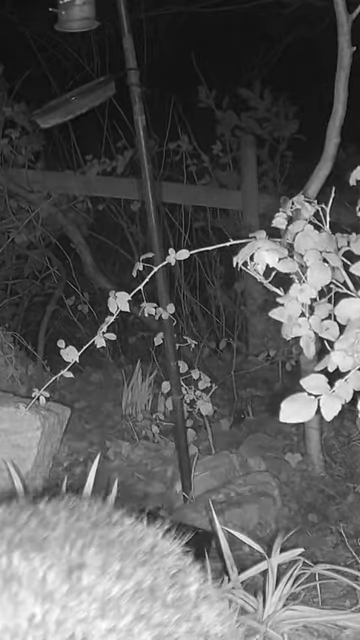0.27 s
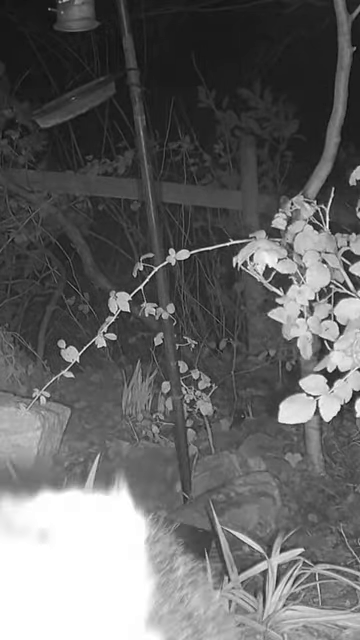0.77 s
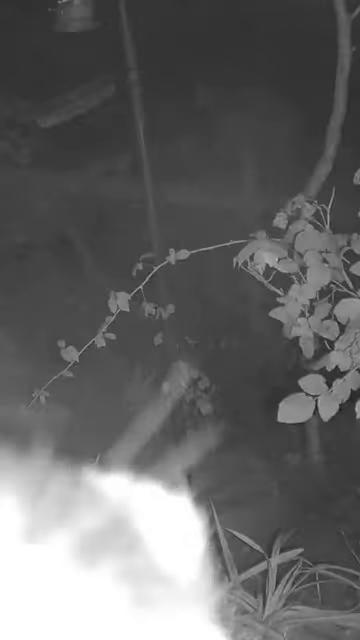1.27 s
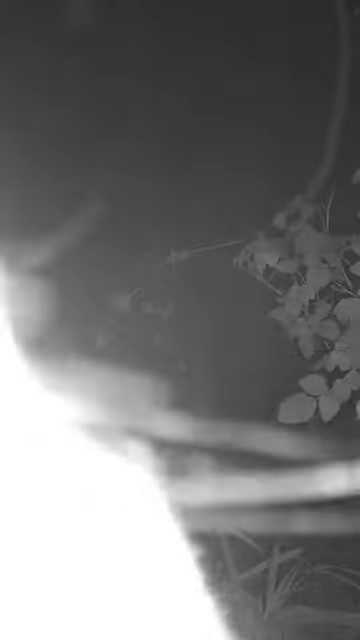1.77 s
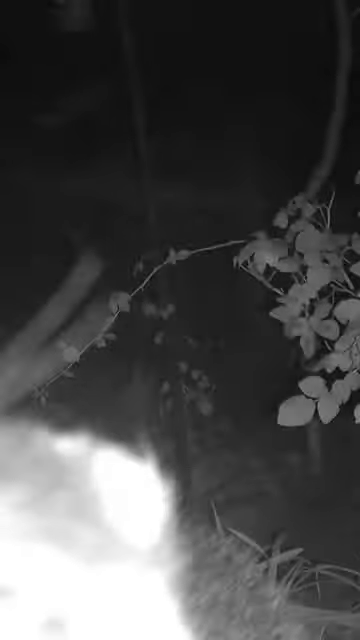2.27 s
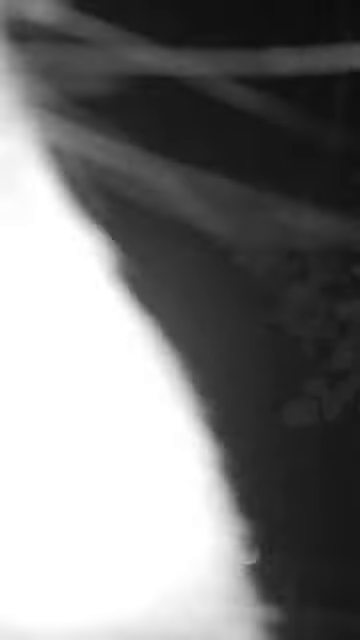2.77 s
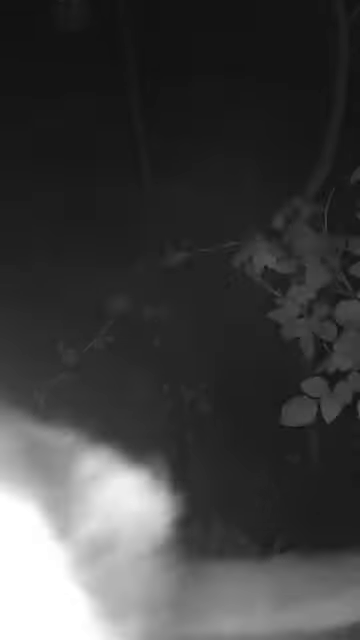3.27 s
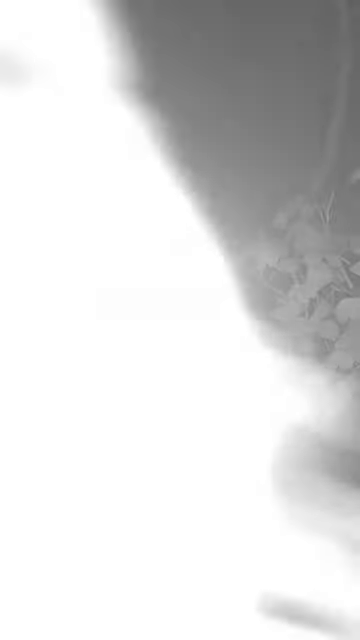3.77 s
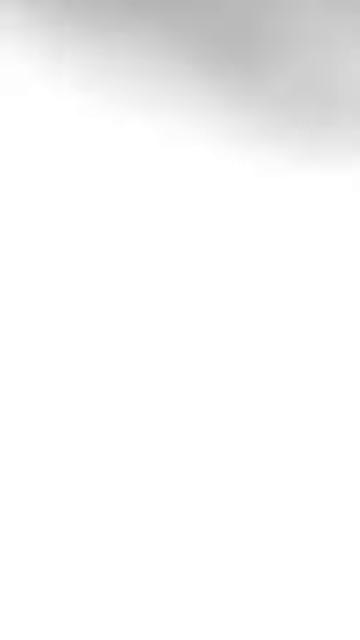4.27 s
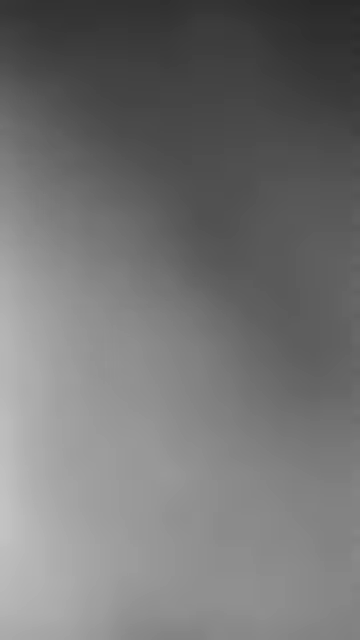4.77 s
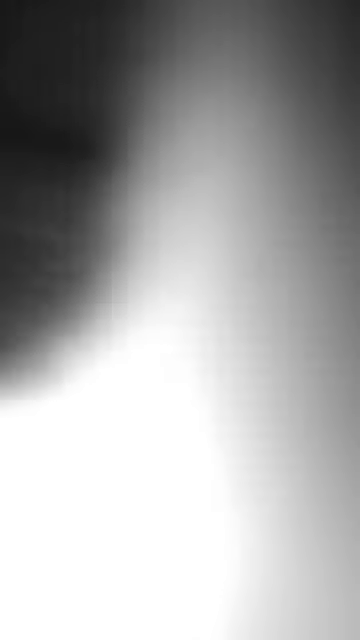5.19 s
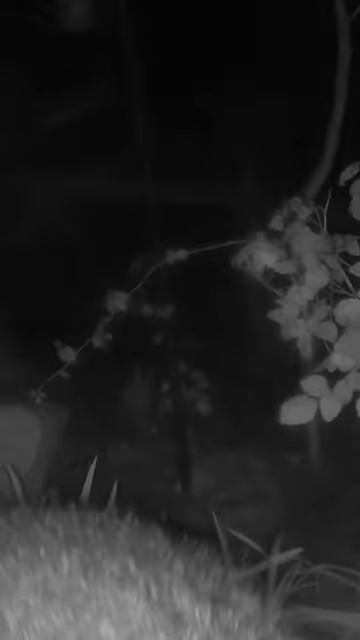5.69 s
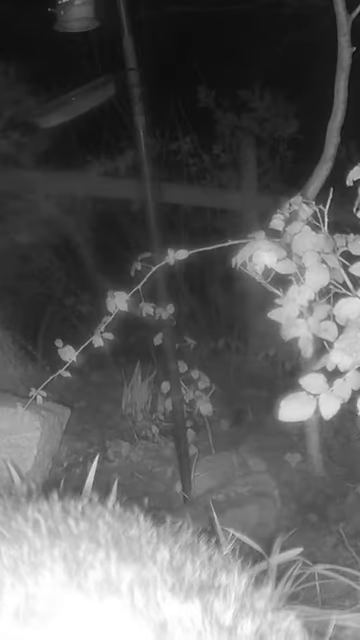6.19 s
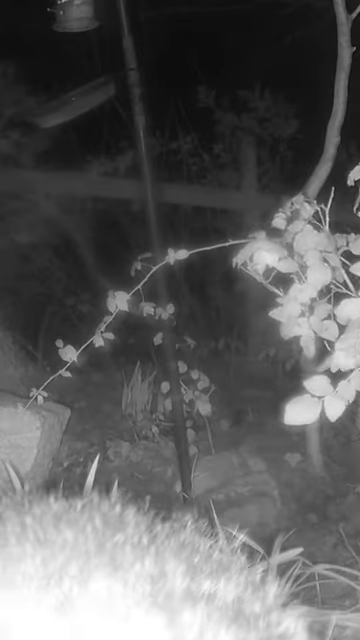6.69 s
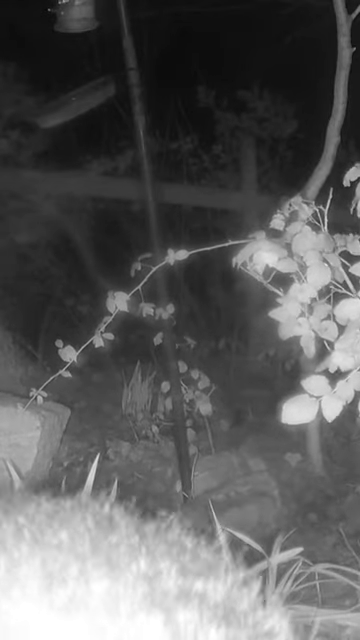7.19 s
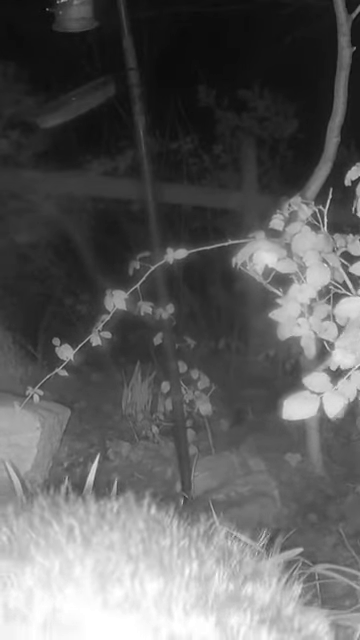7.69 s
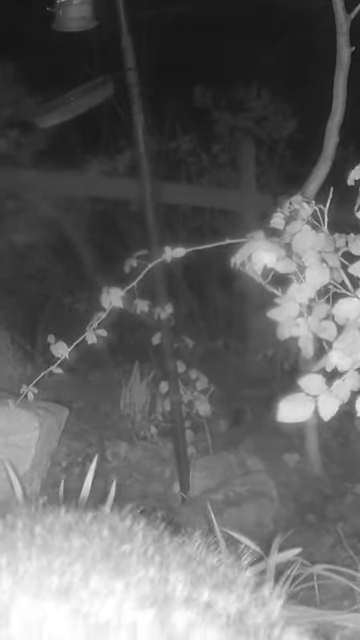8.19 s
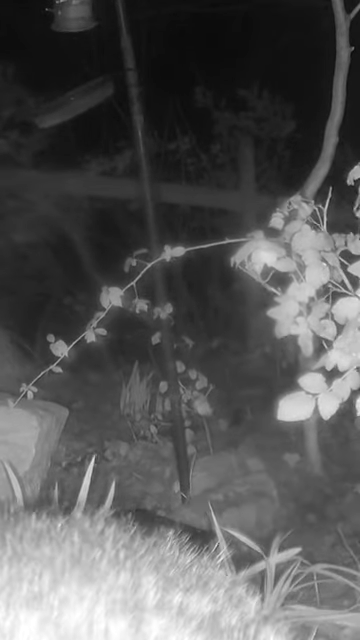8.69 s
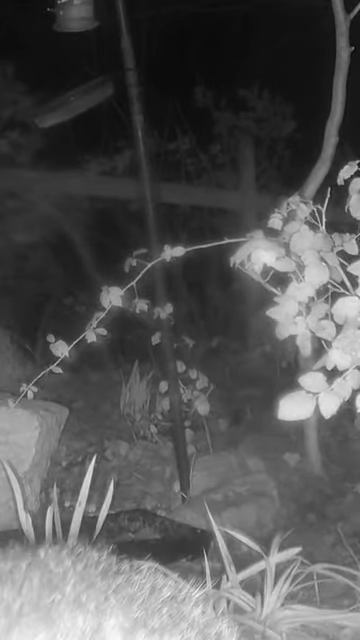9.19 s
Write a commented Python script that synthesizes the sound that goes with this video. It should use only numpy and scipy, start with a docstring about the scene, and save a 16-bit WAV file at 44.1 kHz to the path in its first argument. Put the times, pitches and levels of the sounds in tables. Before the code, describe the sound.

Very close, dry mono sound from a microphone inside a knocked plastic case outdoors. Fine hiss and a thin high whine stay constant while an animal puffs air through its nose, bumps and scrapes the shell and makes it sway with deep rumbles. Irregular thuds cluster in the middle, sniffing fades, and after a quiet gap a sudden overloaded crash of blows hits, then soft sniffs and a last scuffle.

```python
"""In a quiet garden at night, a badger sniffs at a trail camera and shoves it about.
Puffs of shaped noise hiss and whistle; snout and paws strike ringing modes of the plastic housing.
Random flicks make the rasp of bristles, and each shove sets the camera swaying, lurching and juddering.
The hardest blows overload the input; the camera's own hiss and thin whine run underneath throughout."""
import sys
import numpy as np
from scipy import signal
from scipy.fft import rfft, irfft, next_fast_len
from scipy.io import wavfile

SR = 44100
rng = np.random.default_rng(int(sys.argv[2]) if len(sys.argv) > 2 else 0)


def unload_wav(signal):
    """Save mono or channel-first audio to the path in sys.argv[1] as 16-bit WAV at rate SR, clipped to [-1, 1]."""
    wavfile.write(
        sys.argv[1],
        SR,
        np.round(np.clip(np.atleast_2d(signal).T, -1, 1) * 32767).astype(np.int16),
    )


N = 416744  # length in samples
TIME = np.arange(N) / SR  # seconds


def amp(db):
    """Turns decibels into a plain multiplier."""
    return 10 ** (np.asarray(db) / 20)


def unit(x):
    """Scales x to rms 1."""
    return x / np.sqrt(np.mean(x ** 2) + 1e-20)


def add(mix, start_s, sound):
    """Adds a sound to the mix from start_s on, cutting off what runs past the end."""
    part = mix[max(round(start_s * SR), 0):][:len(sound)]
    part += sound[:len(part)]


def butter(x, hz, kind, order=2):
    """Filters x, keeping the low part or a band of it."""
    edges = np.clip(hz, 1, SR / 2 - 1)
    return signal.sosfilt(signal.butter(order, edges, kind, fs=SR, output="sos"), x)


def resonance(x, hz, width):
    """Passes x twice through a resonance of gain 1, so that its skirts are steep."""
    b, a = signal.iirpeak(hz, hz / width, fs=SR)
    once = signal.lfilter(b, a, x)
    return signal.lfilter(b, a, once)


def coloured(x, points):
    """Filters x with a curve drawn through (Hz, dB) points; rms 1."""
    hz, db = np.transpose(points)
    size = next_fast_len(len(x))
    bins = np.fft.rfftfreq(size, 1 / SR)
    gain = amp(np.interp(np.log(bins + 1), np.log(hz), db))
    return unit(irfft(rfft(x, size) * gain, size)[:len(x)])


def wander(size, hz):
    """Slow chance, rms 1, changing up to about hz times a second."""
    return unit(butter(rng.standard_normal(size), hz, "low"))


# The badger's sniffs. Each row: time of the peak in seconds, level in dB, rise in seconds,
# fall in seconds, ring of the nose in dB before the common nasal_db.
SNIFFS = [(0.423, -46.5, .016, 0.012, 1.5), (0.464, -34, 0.015, 0.011, -0.5), (1.328, -35, 0.011, 0.025, 5),
          (1.45, -46.5, 0.04, 0.031, 4), (2.192, -50.5, 0.069, .012, 0), (2.264, -36.5, 0.038, 0.022, -1.5),
          (2.573, -47, 0.0053, .008, 8), (2.614, -46, 0.02, 0.027, 3.5), (2.875, -51.5, 0.005, 0.023, 8),
          (3.004, -37, 0.014, 0.014, 1.5), (3.278, -50, .025, 0.015, 4.5), (3.324, -49.5, 0.025, 0.069, -7),
          (3.41, -33, 0.021, 0.02, -7.5), (3.547, -46, 0.01, 0.011, 2.5), (3.578, -43, 0.012, 0.013, -0.5),
          (3.663, -55.5, 0.066, 0.041, -18), (3.854, -46, 0.007, 0.017, 15.5),
          (3.952, -41.5, .011, 0.02, 5), (4.119, -51.5, 0.052, 0.047, 8), (4.352, -53.5, 0.009, .013, 7.5),
          (4.473, -43, 0.009, 0.016, 3), (4.565, -46.5, .007, .012, 6), (4.854, -46.5, 0.0022, .032, 10),
          (4.954, -46.5, 0.016, 0.038, 2.5), (5.018, -48.5, 0.021, .05, 5),
          (5.148, -42.5, 0.031, 0.014, -6), (5.189, -41, .012, 0.017, 4.5),
          (5.396, -43, 0.035, 0.071, -6.5), (5.443, -39, 0.016, 0.019, -6), (5.474, -34, 0.02, 0.011, -8),
          (5.599, -47.5, 0.039, 0.066, -6), (7.348, -50.5, 0.051, .08, -4.5),
          (7.781, -50.5, .046, .031, 0.5), (8.213, -21, 0.0056, 0.0099, 1),
          (8.236, -35.5, 0.0029, .012, 12), (8.548, -47, 0.037, 0.014, -5), (8.738, -53, .023, .009, -1.5),
          (8.928, -44.5, 0.026, .013, -2.5), (9.138, -37, 0.019, 0.02, 2), (9.35, -43, .018, 0.017, -2.5)]
SNIFF_WHISTLE_HZ, SNIFF_WHISTLE_DB = 4325, -10.5
# Soft, whistling wheezes between the sniffs. Each row: time of the peak in seconds, level in dB.
WHEEZES = [(0.277, -61), (1.562, -57), (1.846, -60.5), (2.45, -59.5), (3.752, -58.5)]
WHEEZE_S, WHEEZE_NASAL_DB = 0.041, 5  # the same time for rise and fall
WHEEZE_HZ, WHEEZE_WHISTLE_DB = 3270, 2


def sniffs():
    """Sharp puffs of air from the nose, with a soft wheeze here and there between them."""
    out = np.zeros(N)
    for row in SNIFFS:
        add(out, *puff(*row, SNIFF_WHISTLE_HZ, SNIFF_WHISTLE_DB))
    for peak_s, db in WHEEZES:
        add(out, *puff(peak_s, db, WHEEZE_S, WHEEZE_S, WHEEZE_NASAL_DB, WHEEZE_HZ, WHEEZE_WHISTLE_DB))
    return out


# Resonances of the snout. Each row: pitch in Hz before a small random shift in each puff,
# width of one filter pass in Hz, level in dB against the others.
SNOUT = [(881, 77, 6.5), (1038, 102, 8), (1256, 110, -11), (1727, 395, -3), (2460, 270, -7.5)]
# Air rushing through the nostrils. Each row: frequency in Hz, relative level in dB per Hz.
RUSH = [(150, 11), (330, 3), (700, 2), (1000, -1.5), (1350, 4.5), (2000, -6), (2500, 6), (3100, 6),
        (3700, -0.5), (4400, 6), (5100, 3.5), (6500, -8), (8300, -2.5), (9500, -37), (16000, -30)]
# Air grazing the microphone hole. Each row: frequency in Hz, relative level in dB per Hz.
FIZZ = [(4000, -32), (6100, 0), (6550, 1.5), (7000, -2), (8200, 1), (9100, 3.5), (10400, 1), (11500, -3.5),
        (13000, -2.5), (15000, -6), (16500, -31)]
FIZZ_DB_PER_NASAL_DB = -.3  # the more a puff rings in the snout, the less air grazes the microphone


def puff(peak_s, db, rise, fall, nasal, whistle_hz, whistle, rush_db=0, nasal_db=-1, fizz_db=0.0,
         whistle_width_hz=330, flutter_db=2):
    """A puff swells and dies: turbulence rings the snout, whistles in a nostril, fizzes on the mic hole."""
    lag = np.arange(-SR // 4, SR // 4) / SR  # seconds from the peak
    throat, nostril, edge, jet = rng.standard_normal((4, len(lag)))
    flare = 1 + .012 * rng.standard_normal()  # shifts all snout pitches together
    snout = np.zeros(len(lag))
    for k, (hz, width, gain) in enumerate(SNOUT):
        snout += (-1) ** k * amp(gain) * resonance(throat, hz * flare, width)
    # a gentle flow whistles, a hard one breaks up into a broad band
    breadth = whistle_width_hz * 2 ** ((db + 46) / 30)
    air = amp(rush_db) * coloured(nostril, RUSH)
    air += amp(nasal_db + nasal) * unit(snout)
    air += amp(fizz_db + FIZZ_DB_PER_NASAL_DB * nasal) * coloured(jet, FIZZ)
    air += amp(whistle) * unit(resonance(edge, whistle_hz, breadth))
    swell = np.exp(-abs(lag / np.where(lag < 0, rise, fall)) ** 1.5)
    level = amp(db + flutter_db * wander(len(lag), hz=106))
    return peak_s + lag[0], level * swell * air


# Blows on the housing. Each row: time in seconds, level in dB, hardness as the contact's cut-off in Hz,
# thud in dB against the knock before the common thud_db.
KNOCKS = [(0.473, -42.5, 330, 14.5), (2.249, -39, 450, 7.5), (2.581, -43.5, 723, -10),
          (2.626, -34, 1000, -12), (2.68, -24.5, 700, 6.5), (2.745, -44.5, 477, 30.5),
          (2.917, -21.5, 765, -31), (3.021, -41, 905, -17), (3.08, -30.5, 520, 12),
          (3.274, -39.5, 830, 9.5), (3.575, -38, 757, 3), (3.604, -32, 750, -17), (3.855, -46.5, 694, 11),
          (3.975, -38, 810, 2), (4.078, -28.5, 585, -4), (4.106, -33.5, 596, -14), (4.156, -28.5, 490, 6.5),
          (4.186, -28.5, 1500, 2), (4.288, -34, 670, 7), (4.455, -38.5, 645, 20.5), (4.594, -41, 696, 21),
          (4.658, -35, 700, 16), (4.726, -26, 770, 13.5), (5.368, -39, 847, 21.5), (5.896, -28.5, 450, 14),
          (5.941, -35.5, 700, 16), (6.26, -30, 666, 18.5), (6.289, -33.5, 880, 26),
          (6.323, -20, 1270, 14.5), (6.347, -25, 895, 13.5), (6.385, -42, 597, 11.5), (6.436, -46, 750, 12),
          (6.567, -36.5, 634, 19), (6.603, -40, 1000, 10), (6.624, -36.5, 528, 3),
          (6.726, -37.5, 523, 18.5), (6.755, -41.5, 750, -7), (6.78, -43, 760, -8), (6.923, -29, 750, 3),
          (6.946, -34.5, 760, -13), (6.965, -31.5, 656, 3), (7.167, -31, 840, -17), (7.201, -25.5, 925, 1),
          (7.217, -27.5, 1030, 10.5), (7.249, -41, 695, 3), (7.986, -35, 600, -16), (8.002, 3.5, 1000, 4.5),
          (8.012, -10, 1050, -1), (8.04, -35, 450, -5), (8.108, -23.5, 905, 14), (8.118, -4, 1460, -7),
          (8.133, -14, 1010, 12.5), (8.155, -11, 1310, 4), (8.167, -16, 880, -4), (8.234, -12, 1410, -5),
          (8.257, -23.5, 700, 11), (8.307, -21.5, 523, -4), (8.374, -40.5, 517, 18), (9.133, -35.5, 704, 7),
          (9.203, -40.5, 700, 10), (9.27, -34, 418, 7.5)]
# The whole box on its mount. Each row: pitch in Hz, level in dB, seconds to fade by 60 dB;
# ring() varies pitch and level a little.
THUD = [(64.4, 3, 0.11), (93.4, -0.5, 0.085), (181, -3, 0.16)]
SCUFF_DB, SCUFF_DB_PER_DB = -13.5, 0.33  # scuff against strike at 0 dB; lighter contacts slide more


def knocks(damping_per_s=28, touch_s=0.0051, grip_s=0.0081, thud_db=-7.0):
    """A contact scuffs around the strike; soft flesh wakes only the low modes, claws the high ones too."""
    out, t = np.zeros(N), np.arange(SR // 3) / SR
    lead = SR // 25  # samples before the strike, room for the scuff
    attack = slice(lead, lead + SR // 50)  # the 20 ms in which the level is set
    lag = t - t[lead]
    for strike_s, db, hard_hz, thud in KNOCKS:
        scuff_shape = np.exp(np.where(lag < 0, lag / touch_s, -lag / grip_s))
        grit = rng.standard_normal(len(t)) * scuff_shape
        force = amp(SCUFF_DB - SCUFF_DB_PER_DB * db) * grit / np.linalg.norm(grit)
        force[lead] += 1  # the clean strike
        contact = butter(force, hard_hz, "low", order=3)
        shell = signal.fftconvolve(contact, ring(HOUSING, t))[:len(t)]
        box = butter(signal.fftconvolve(force, ring(THUD, t))[:len(t)], 275, "low")
        blow = shell / shell[attack].std() + amp(thud + thud_db) * box / box[attack].std()
        # a hard push stays on the plastic and mutes it
        damped = np.exp(-damping_per_s * amp(db / 2) * np.maximum(lag, 0))
        add(out, strike_s - t[lead], amp(db) * blow * damped)
    return out


# The ringing plastic housing. Each row: pitch in Hz, level in dB, seconds to fade by 60 dB;
# ring() varies pitch and level a little.
HOUSING = [(260, -6, 0.039), (282.8, -3, 0.17), (344, 1, 0.023), (435, -10.5, 0.11), (487.7, -16, 0.19),
           (575, -10, 0.12), (629.6, 2.5, 0.039), (708, -6.5, 0.09), (825, -0.5, 0.0069), (866, -5, 0.058),
           (944, -22, 0.089), (1223, -2.5, 0.029), (1378, -7.5, 0.033), (1428, -2.5, 0.024),
           (1722, 2, 0.016), (2010, 2, 0.0062), (2520, -3.5, .025)]


def ring(modes, t):
    """Dying modes; each point of contact weights and bends them a little differently."""
    hz, db, t60 = np.transpose(modes)[:, :, None]
    weight, bend = rng.standard_normal((2, len(modes), 1))
    side = rng.choice([-1, 1], hz.shape)  # each mode starts upwards or downwards
    fade = np.exp(np.float32(-np.log(1000) * np.minimum(t / t60, 10)))
    wave = np.sin(np.float32(2 * np.pi * hz * (1 + .008 * bend) * t))
    return (side * amp(db + 2 * weight) * fade * wave).sum(0)


def scrape(judder, scrape_db=-15.5, grind_db=-13):
    """The snout drags while the camera judders; a hard push turns the drag into a brighter grinding."""
    drag = amp(scrape_db) * judder * slipping(slips_per_s=260, bright_hz=480)
    grind = amp(grind_db) * judder ** 2 * slipping(slips_per_s=600, bright_hz=1200)
    return drag + grind


def slipping(slips_per_s, bright_hz):
    """Tiny random slips that keep the housing murmuring, rms 1."""
    slips = rng.standard_normal(N) * (rng.random(N) < slips_per_s / SR)
    soft = butter(slips, bright_hz, "low")
    return unit(signal.oaconvolve(soft, ring(HOUSING, TIME[:SR // 3]))[:N])


# Bristles rubbing over the housing. Each row: start in seconds, length in seconds,
# level in dB before the common rub_db, pitch of the rasp in Hz.
RUBS = [(1.318, 0.016, -35, 4540), (2.243, 0.011, -30.5, 910), (2.603, 0.021, -41, 2980),
        (2.666, 0.011, -38.5, 990), (2.911, .003, -37.5, 1600), (4.048, 0.0067, -38, 3670),
        (4.149, 0.028, -30, 5050), (4.18, 0.0096, -22.5, 2080), (4.285, 0.0055, -25.5, 1970),
        (4.641, 0.015, -42, 2600), (4.652, 0.053, -27, 990), (4.849, 0.018, -50, 2600),
        (5.172, 0.019, -41, 2570), (7.968, 0.0076, -27.5, 6860), (8.118, 0.0073, -29.5, 5360),
        (9.167, 0.028, -31.5, 1580), (9.182, 0.0036, -22, 2670)]
# The rasp of bristles on plastic. Each row: frequency in Hz, relative level in dB per Hz.
RASP = [(410, -47), (700, -19.5), (971, -0.5), (1140, -14), (1730, -2), (2020, -9), (2270, -6), (3840, -11),
        (4490, -8.5), (12500, -23), (16000, -37)]


def rubs(flicks_per_s=3000, attack_s=0.0063, release_s=0.0071, ring_db=-5, ring_share=0.56,
         rub_db=-1, clump_db=1):
    """Bristles flick over the plastic in a dense, clumped crackle that rings one patch of the shell."""
    out, t = np.zeros(N), TIME[:SR // 5]
    for start_s, length, db, hz in RUBS:
        flicks = rng.standard_normal(len(t)) * (rng.random(len(t)) < flicks_per_s / SR)
        patch = unit(resonance(flicks, hz, ring_share * hz))
        rasp = coloured(flicks, RASP) + amp(ring_db) * patch
        stroke = np.minimum(t / attack_s, 1) * np.exp(-np.maximum(t - length, 0) / release_s)
        level = amp(db + rub_db + clump_db * wander(len(t), hz=160))
        add(out, start_s, level * stroke * rasp)
    return out


# Small dry ticks. Each row: start in seconds, peak level in dB, brightness in Hz (sets the band).
TICKS = [(0.0751, -22, 10000), (0.0918, -28, 3800), (0.097, -31, 3800), (0.1012, -29, 3570),
         (0.104, -21.5, 3800), (0.108, -27, 4000), (0.1233, -23.5, 4500), (0.597, -24, 12000),
         (1.373, -23, 9000), (2.591, -25, 11000), (2.916, -24, 2940)]


def ticks(decay_s=0.00089):
    """Tiny snaps of band-limited noise with almost no ring."""
    out, t = np.zeros(N), np.arange(SR // 50) / SR
    for start_s, db, hz in TICKS:
        burst = rng.standard_normal(len(t)) * np.exp(-t / decay_s)
        snap = butter(burst, [hz / 2.5, hz * 1.5], "band")
        add(out, start_s, amp(db) * snap / abs(snap).max())
    return out


# Shoves on the camera. Each row: time in seconds when the shove is half built up, seconds from then
# until it lets go, then the strengths in dB of the mount's sway, the body's lurch and the judder,
# before the trims in mount() and scrape().
SHOVES = [(0.464, 0.042, -21.5, -15, -32), (1.333, 0.058, -16.5, -17, -31.5),
          (2.187, 0.14, -23, -26, -45.5), (2.575, 0.043, -9, -14, -29), (2.665, 0.097, -12.5, -19, -25),
          (2.805, 0.045, -30, -30, -41), (2.902, 0.023, -10, -18.5, -37), (3.009, 0.077, -42, -13, -25),
          (3.252, 0.044, -14.5, -14.5, -30.5), (3.347, 0.043, -38, -30, -38.5),
          (3.536, 0.073, -21.5, -17, -31), (3.87, 0.057, -12.5, -18.5, -32.5),
          (4.057, 0.02, -7, -11, -21.5), (4.166, 0.019, -38, -16, -28), (4.225, .05, -40, -28, -35),
          (4.386, 0.084, -8, -22, -28.5), (4.574, 0.073, -7, -8.5, -26), (4.646, 0.076, -27, -2.5, -21.5),
          (4.768, 0.025, -24, -23, -42), (4.868, 0.11, -11.5, -22, -29.5), (5.05, 0.13, -25.5, -31, -35.5),
          (5.323, 0.024, -11, -24, -51), (5.45, .08, -42, -22.5, -33), (5.912, 0.074, -15.5, -17, -31),
          (6.266, 0.055, -21.5, -5.5, -18), (6.388, .03, -48, -40, -28),
          (6.584, 0.027, -24.5, -12.5, -21.5), (6.707, 0.066, -32, -23.5, -33.5),
          (6.917, 0.057, -10, -6, -22), (7.17, 0.043, -10.5, -5.5, -29), (7.29, 0.041, -34, -21, -42),
          (7.991, 0.015, -18, 5.5, -7), (8.113, 0.045, -8, 2, -13), (8.212, 0.017, -31, -3.5, -8.5),
          (8.304, 0.097, -40, -17.5, -33), (9.138, 0.025, -28, -16.5, -18.5), (9.19, 0.055, -14, -19, -37),
          (9.315, 0.04, -36, -25, -30)]
SHOVE_RISE_S = 0.052  # the whole build-up
SWAY_FALL_DB_PER_S, LURCH_FALL_DB_PER_S, JUDDER_FALL_DB_PER_S = 59.5, 179, 169
SWAY_REST_DB, LURCH_REST_DB, JUDDER_REST_DB = -52, -53, -71  # the mount is never quite still


def shaking():
    """Strengths of sway, lurch and judder: each builds under a shove, holds, then dies at its own rate."""
    half_built, length, sway, lurch, judder = np.transpose(SHOVES)[:, :, None]
    t = TIME[::40]  # coarse steps are enough for slow curves
    build = np.sin(np.pi / 2 * np.clip(.5 + (t - half_built) / SHOVE_RISE_S, 0, 1)) ** 2
    free_s = np.maximum(t - half_built - length, 0)  # time since the shove let go
    motions = [(sway, SWAY_FALL_DB_PER_S, SWAY_REST_DB),
               (lurch, LURCH_FALL_DB_PER_S, LURCH_REST_DB),
               (judder, JUDDER_FALL_DB_PER_S, JUDDER_REST_DB)]
    strengths = []
    for db, fall, rest in motions:
        pushed = np.linalg.norm(build * amp(db - fall * free_s), axis=0)  # all shoves together
        strengths.append(np.interp(TIME, t, np.hypot(amp(rest), pushed)))
    return strengths


SWAY_HZ = 16.1


def mount(sway, lurch, judder, sway_db=-1, lurch_db=-5.0, judder_db=-2):
    """Pushes set the camera swaying on its springy mount; it lurches and judders while the snout slips."""
    swing = np.sqrt(2) * np.sin(2 * np.pi * SWAY_HZ * TIME)
    swaying = amp(sway_db) * sway * swing
    lurching = amp(lurch_db) * lurch * shudder(low_hz=26.65, high_hz=56.57)
    juddering = amp(judder_db) * judder * shudder(low_hz=62.2, high_hz=103.1)
    return swaying + lurching + juddering


def shudder(low_hz, high_hz):
    """Irregular to-and-fro motion of even strength, rms 1."""
    band = butter(rng.standard_normal(N), [low_hz, high_hz], "band", order=3)
    motion = signal.hilbert(band, next_fast_len(N))[:N]
    even = motion.real / abs(motion)  # dividing by the envelope levels the strength
    return unit(butter(even, high_hz * 1.042, "low", order=6))


# Hiss of the camera's electronics. Each row: frequency in Hz, relative level in dB per Hz.
HISS = [(59, -41.5), (100, -10.5), (156, -12), (415, -12), (558, -12.5), (691, -14), (1150, -14.5),
        (1550, -16.5), (8110, -20), (10200, -19.5), (10900, -21), (15000, -20.5), (16000, -36.5)]
HISS_DB, WHINE_HZ = -51.5, 10000


def electronics(whine_db=-58, sizzle_hz=13380, sizzle_db=-69):
    """Steady preamplifier hiss, a thin whine and a fainter, fuzzy one above it."""
    hiss = amp(HISS_DB) * coloured(rng.standard_normal(N), HISS)
    sizzle = amp(sizzle_db) * unit(resonance(rng.standard_normal(N), sizzle_hz, width=430))
    whine = amp(whine_db) * np.sqrt(2) * np.sin(2 * np.pi * WHINE_HZ * TIME)
    return hiss + sizzle + whine


def scene():
    """The badger's contacts and sniffs over the camera's own noise."""
    sway, lurch, judder = shaking()
    contacts = knocks() + scrape(judder) + rubs() + ticks()
    mix = sniffs() + contacts + mount(sway, lurch, judder) + electronics()
    return mix[None]  # one channel


EDGE_HZ = 16000  # upper band limit


def record(dry):
    """The input rounds off near full scale and saturates there; then comes the band limit."""
    knee = .8  # straight up to here
    linear = np.clip(dry, -knee, knee)
    clipped = linear + (1 - knee) * np.tanh((dry - linear) / (1 - knee))
    band_limit = signal.firwin(401, EDGE_HZ, window=("kaiser", 9), fs=SR)
    return signal.oaconvolve(clipped, band_limit[None], "same")


dry = scene()
out = record(dry)
unload_wav(out)
```